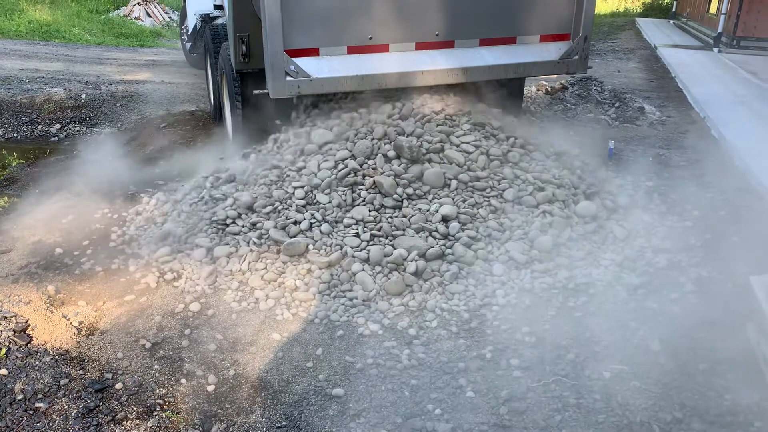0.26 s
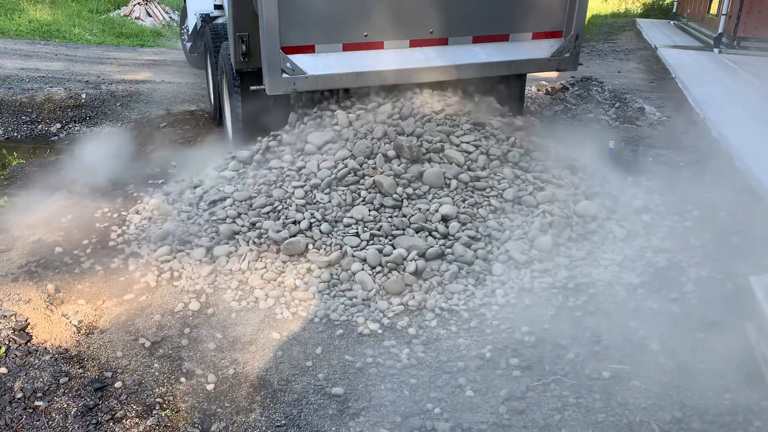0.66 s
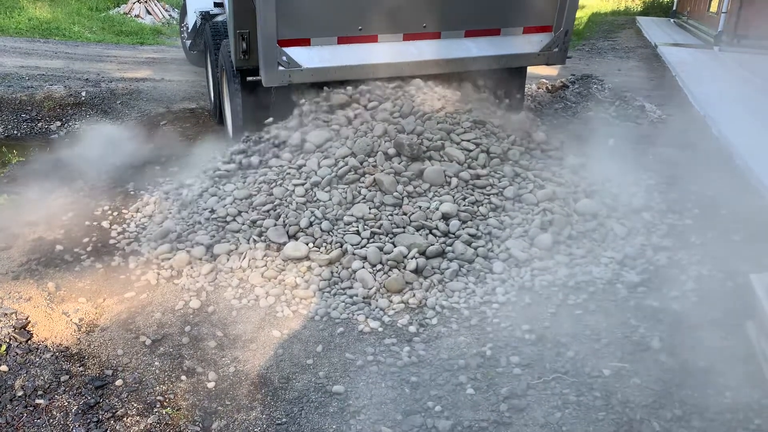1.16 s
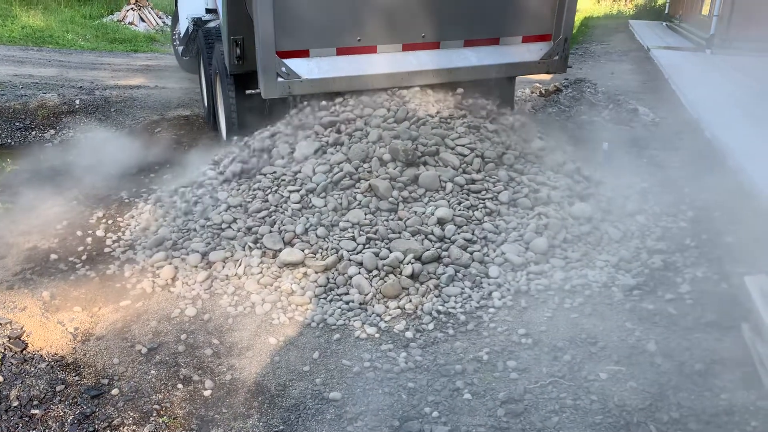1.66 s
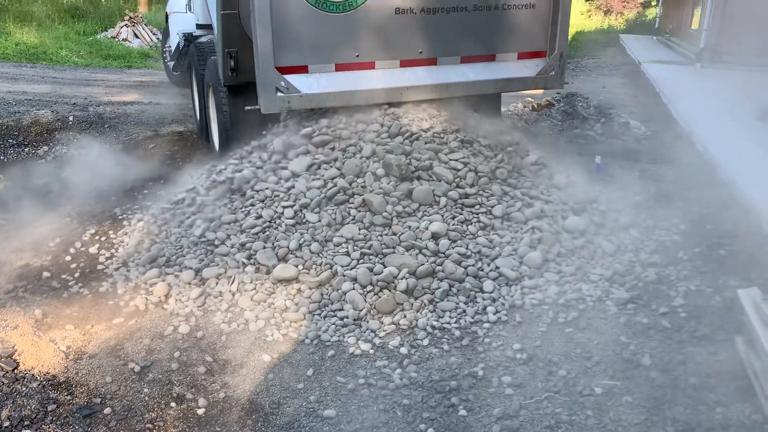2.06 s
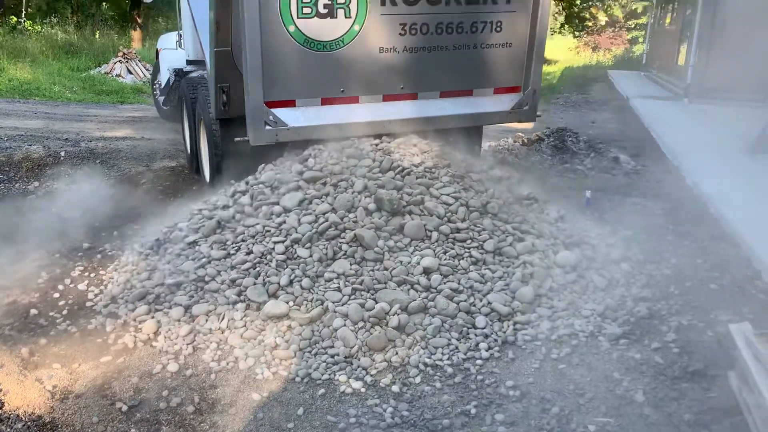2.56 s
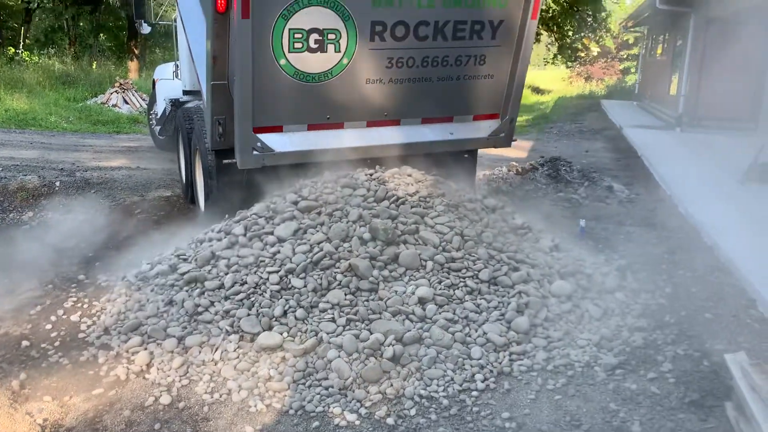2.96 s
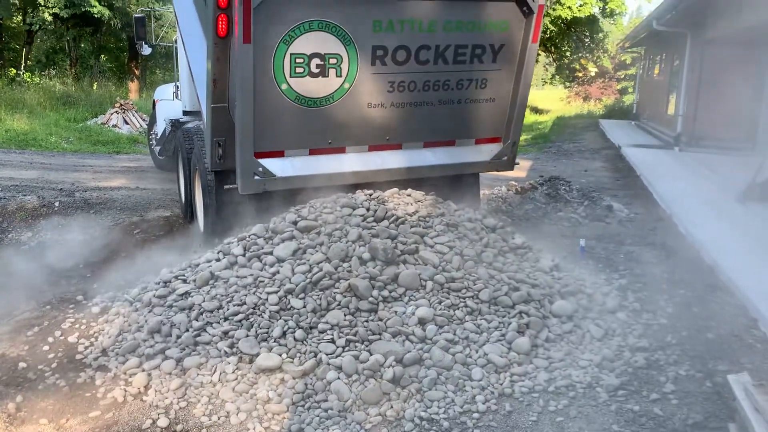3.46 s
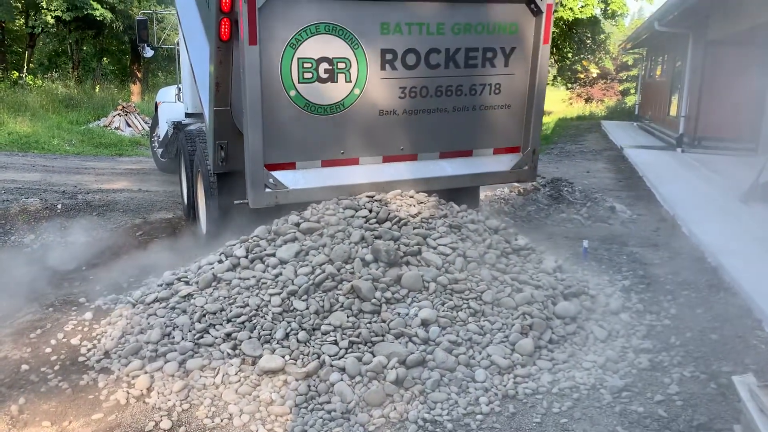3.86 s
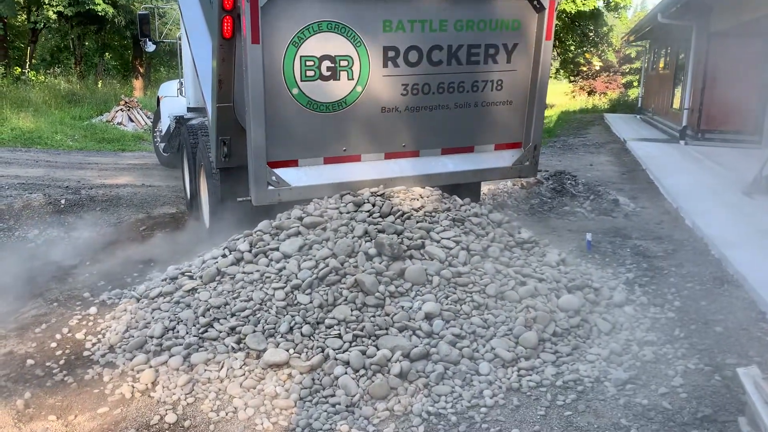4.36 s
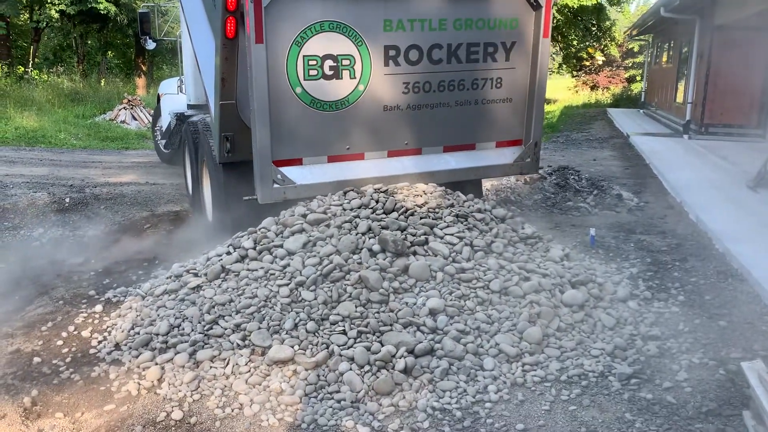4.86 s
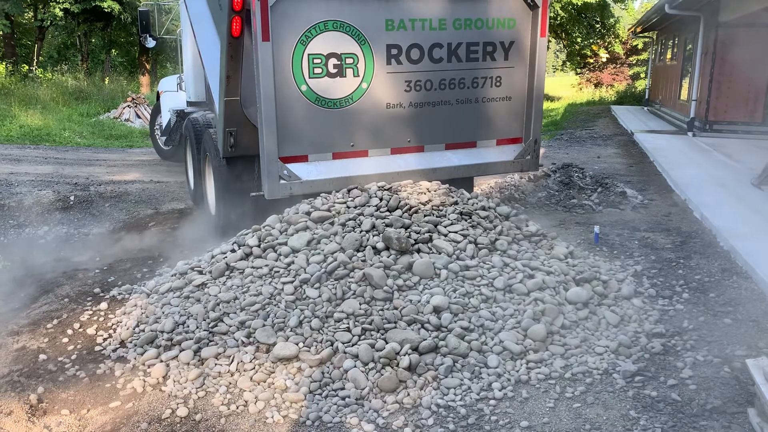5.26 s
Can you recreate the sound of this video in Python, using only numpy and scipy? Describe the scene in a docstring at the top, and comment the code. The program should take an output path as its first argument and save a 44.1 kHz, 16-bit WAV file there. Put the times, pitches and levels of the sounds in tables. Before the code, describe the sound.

Heard in stereo from a few metres behind a tipper truck on a gravel drive, river rock is already pouring at the start, a dense, bright clatter with larger cobbles knocking and a hollow drumming from the steel bed. From about 0.9 to 1.5 seconds the tailgate bangs in an irregular burst of heavy metallic blows, leaving long ringing tones; another knock comes near 1.9. Stones skitter over bare steel as the stream thins. Between 2.4 and 3.2 seconds air brakes release in sharp, overlapping hisses, the last loudest, echoing off the house. Around 3.75 light metal taps ring the emptied bed while stones crunch down the pile. Then it is quiet: sparse clicks and a faint low hoist hum over the diesel. Near 4.8 the hum stops with soft low thuds, leaving the idle, a faint slide at 5.1 and a clearer stony crunch at 5.4.

```python
"""A gravel drive beside a house, in stereo from a few metres behind a tipper truck as river rock pours off it.
Dense random collisions make the rush of stones; shaped noise drums on the steel bed and rings in its panels.
Blows of the tailgate excite decaying modes; air brakes hiss as noise jets with an echo off the house.
The hoist pump hums and stops, and the flow thins to single stones ticking down the pile over the idling diesel."""
import sys
import numpy as np
from scipy import signal
from scipy.fft import rfft, irfft, next_fast_len
from scipy.io import wavfile

SR = 44100
rng = np.random.default_rng(int(sys.argv[2]) if len(sys.argv) > 2 else 0)


def wrap_up_sound(samples):
    """Save the sound to the file named by the first command line argument, as 16-bit audio."""
    columns = np.atleast_2d(samples).T
    # keep every value between -1 and 1, then stretch to whole-number steps
    tamed = np.clip(columns, -1, 1)
    steps = np.round(tamed * 32767).astype(np.int16)
    wavfile.write(sys.argv[1], SR, steps)


N = 243873
T = np.arange(N) / SR
SIZE = next_fast_len(N)
BIN_HZ = np.maximum(np.arange(SIZE // 2 + 1) * SR / SIZE, 1)

# All colours below are relative: each coloured texture is brought to unit power before its level is set.
# share of direct sound at the microphone: (frequency [Hz], share of power [0..1])
DIRECT_SHARE = [(200, 0.24), (1000, 0.15), (2700, 0.4), (5000, 0.068), (8000, 1), (11000, 1), (15000, 0.53)]
# likeness of the scattered sound at the two microphone ports: (frequency [Hz], correlation [-1..1])
PORT_LIKENESS = [(100, 0.97), (280, 0.96), (550, 0.47), (1200, 0.56), (2200, 0.97), (4000, 0.1),
                 (6000, -0.52), (9000, -0.47), (15000, -0.85)]
# balance of the ports: (frequency [Hz], left minus right [dB])
LEFT_MINUS_RIGHT = [(1000, 0), (2000, 0.7), (4000, -4), (8000, -0.5)]
PORT_LAG_MS = 0.1768
CUTOFF_HZ = 15900

# colour of the diesel's rumble: (frequency [Hz], density [dB per Hz])
RUMBLE_COLOUR = [(25, -40.5), (45, -30), (70, 8.5), (110, 8.5), (160, 0), (230, 2), (350, 5), (480, -17),
                 (1200, -15), (2500, -19.5), (8000, -33)]
# level of the diesel's rumble: (time [s], level [dB])
RUMBLE_LEVEL = [(0, -45), (.8, -52.5), (2, -50.5), (3.1, -55), (3.65, -61), (3.9, -51), (4.3, -56.5),
                (5.53, -54)]
# first three firing orders of the diesel: (level driving the hoist [dB], level at idle [dB])
FIRING_ORDERS = [(-78, -76), (-70, -61.5), (-61.5, -64)]
FIRING_HZ = 37.55
# tones of the hoist pump: (frequency [Hz], relative level [dB], easing as the bed empties [dB per s])
PUMP_TONES = [(161.5, 0, 1), (368, 1, 7)]
PUMP_START_S, PUMP_RISE_S, PUMP_DB = 2.6, 0.22, -55
HOIST_STOP_S, HOIST_FADE_S = 4.8, 0.079

# low thuds as the body settles: (time [s], level [dB], rise [s], hold [s], t60 [s])
THUDS = [(4.81, -42, .012, 0.03, 0.22), (4.884, -50, .008, 0.011, 0.25), (4.938, -52, 0.008, 0.02, 0.25),
         (5.015, -53.5, .006, .012, 0.35)]
# colour of the thuds: (frequency [Hz], density [dB per Hz])
THUD_COLOUR = [(30, -22), (60, -7), (87, 5.5), (125, -13), (195, 5), (270, -9.5), (420, -10), (700, -23),
               (2000, -39), (8000, -80)]

# air let out of the brakes: (time [s], level [dB], hold [s], ring of the valve relative to the jet [dB])
AIR_PUFFS = [(2.411, -31, 0.05, -23.5), (2.557, -36.5, 0.03, -34), (2.594, -32.5, 0.14, -35),
             (2.693, -28, 0.035, -38), (2.778, -23.5, 0.0055, -27), (2.826, -27.5, 0.025, -27),
             (2.855, -27.5, 0.046, -11.5), (2.965, -29.5, 0.019, -21.5), (3.157, -20.5, 0.0082, -13)]
AIR_RISE_S, AIR_T60_S = 0.0027, 0.39
# resonances of the exhaust valve: (frequency [Hz], width [Hz], level [dB])
VALVE_TONES = [(1110, 160, 2.5), (1590, 92, 5), (1683, 30, 3)]
# colour of the jet: (frequency [Hz], density [dB per Hz])
JET_COLOUR = [(300, -34), (850, -23), (1150, -4.5), (2000, -1.5), (2400, -1.5), (3500, 2), (5500, 1),
              (8000, 7.5), (10500, 7), (13000, 0), (15800, 2)]
# colour of the sound lingering in the yard: (frequency [Hz], density [dB per Hz])
YARD_COLOUR = [(300, -9.5), (900, -3), (1200, 3.5), (1650, 7), (2600, -5.5), (5000, -11.5), (10000, -8),
               (15000, -36)]
# the valve's tone standing out in the yard: (frequency [Hz], width [Hz], height [dB])
YARD_PEAKS = [(1680, 88, 2.5)]
# the house wall throws each puff back
WALL_DELAY_S, WALL_DB, WALL_CUT_HZ = 0.134, -11.5, 2700

# modes of the air tank, rung by the last sharp release: (frequency [Hz], level [dB], t60 [s])
TANK_MODES = [(478, -8, 2.1), (1238, -4, 2.1), (1540, -2, 1.4), (1653, 0, 1.0), (1787, -10, 1.4),
              (2095, -5, .7)]
TANK_S, TANK_DB = 3.157, -46.5
# modes of the emptied bed, rung as the gate swings back on it: (frequency [Hz], level [dB], t60 [s])
EMPTY_BED_MODES = [(317.6, -7, 2.1), (350, -8, 2.1), (570.6, -14, 2.0), (1023, -12, 1.7), (1276, -10, 2.2),
                   (1319, 0, 1.2), (4720, -8, .55)]
EMPTY_BED_S, EMPTY_BED_DB = 3.738, -40
# all ringing modes waver in level
MODE_WAVER_DB, MODE_WAVER_PER_S = 2.5, 4

# blows on the steel body: (time [s], level [dB], low edge [Hz], contact cut-off [Hz],
# ring of the tailgate [dB], ring of the side walls [dB])
BLOWS = [(0.87, -24.5, 180, 1750, -45.5, -49), (0.888, -28, 800, 1800, -33.5, -48),
         (0.932, -25.5, 170, 4100, -42.5, -52), (0.961, -22.5, 150, 5840, -39, -47),
         (0.989, -23.5, 80, 10500, -26.5, -29.5), (1.023, -30, 200, 1700, -26.5, -43),
         (1.113, -35, 250, 900, -39, -49.5), (1.229, -24.5, 700, 2350, -48, -31),
         (1.241, -25.5, 1750, 2880, -52, -31.5), (1.279, -31, 220, 700, -40, -45),
         (1.307, -32, 1400, 2300, -58, -43), (1.341, -25, 800, 1600, -57, -34.5),
         (1.528, -33, 800, 3960, -58, -54), (1.887, -33, 900, 5000, -44, -43),
         (3.057, -38.5, 1500, 3300, -68, -70), (3.739, -40.5, 1050, 4370, -66, -65),
         (3.766, -36, 600, 4700, -61, -69), (3.789, -39.5, 200, 2000, -62, -69),
         (3.815, -35.5, 88, 2000, -50.5, -61.5), (3.862, -42.5, 80, 8000, -61, -66)]
CONTACT_SLOPE = 6.9   # how steeply a contact's power falls above its cut-off
LOW_SLOPE = 7   # how steeply a light blow's power falls below its low edge
# colour of the dense ring of the steel body: (frequency [Hz], density [dB per Hz])
STEEL_COLOUR = [(40, -44), (80, -3.5), (160, -8.5), (310, -12), (520, -3), (800, -5), (1200, -1.5),
                (1700, -1.5), (2600, -4), (5000, -9), (10000, -5), (15000, -3)]
# decay of the dense ring: (frequency [Hz], t60 [s])
STEEL_T60 = [(80, 1.8), (300, 1.2), (1200, 1.07), (2500, 0.44), (5000, 0.49), (12000, 0.51)]
# clusters of modes in the steel body: (frequency [Hz], width [Hz], height [dB])
STEEL_PEAKS = [(351, 54, 14.5), (1060, 73, 6), (1227, 40, 3.5), (1730, 35, 7.5), (2070, 50, 3)]
# strongest modes of the tailgate: (frequency [Hz], level [dB], t60 [s])
GATE_MODES = [(181.8, -10.5, 1.58), (306, -7.5, 2.6), (336, -6, 2.54), (362.5, 3.5, 1.22),
              (481.3, -3.5, 1.2), (644.3, -9, 2.9), (750, -10, 0.85), (973, -4, 0.9), (1080, -7.5, 0.7),
              (1222, -9, 1.2), (1415, -12.5, 1.9), (1478, -3.5, 0.9), (1620, -3, 0.76), (1768, -16, 1.2),
              (2457, -25, 0.6)]
# strongest modes of the side walls: (frequency [Hz], level [dB], t60 [s])
WALL_MODES = [(512, -11.5, 3.1), (658.4, -6, 4.03), (735.5, -12, 5.1), (855, -14.5, 1.8),
              (1057, -17.5, 6.6), (1090, -3, 0.55), (1174, -20, 11), (1222, 3, 0.68), (1310, -10, 1.8),
              (1465, -14.5, 2.5), (1529, -11.5, 1.5), (1700, -10.5, 2.5), (1773, -5.5, 2.2)]

# the last of the load skitters over bare steel: (time [s], level [dB], rise [s], hold [s], t60 [s])
SKITTER = (1.75, -42, 0.5, 0.32, 1.1)
# resonances of the bare floor: (frequency [Hz], width [Hz], level [dB])
BARE_FLOOR_TONES = [(1044, 81, -1.5), (1140, 55, -5.5), (1350, 210, -1), (1640, 150, 1.5)]
# colour of the drumming bed: (frequency [Hz], density [dB per Hz])
BED_COLOUR = [(40, -20), (90, -16.5), (200, -3), (280, 0.5), (420, -3.5), (640, -6), (1000, -11.5),
              (2000, -17), (5000, -49)]
# panel tones of the bed under sliding stones: (frequency [Hz], width [Hz], level [dB])
BED_TONES = [(274, 6, 0), (361, 10, -13), (395, 10, -11), (484, 8, -11), (509, 8, -9), (635, 12, -7),
             (730, 8, -11), (895, 10, -13)]
# the load shifts and drums along the bed: (time [s], level [dB], rise [s], hold [s], t60 [s])
SURGES = [(0, -34, 0.0019, 0.029, 1.3), (0.847, -34, 0.12, .1, 9.9), (3.724, -41.5, 0.15, 0.026, 0.87)]
DRUM_DB = -7.5   # bed level under the flow, relative to its clatter
PRESS_DB_PER_DB = 1.34   # a fuller flow presses harder on the panels and brings out their tones

# small slides of stones down the pile: (time [s], level [dB], rise [s], hold [s], t60 [s])
SLIDES = [(3.75, -39.5, 0.033, 0.11, 0.27), (5.102, -48.5, 0.036, 0.014, 0.25),
          (5.396, -45.5, 0.024, 0.015, 0.28)]
# colour of the slides: (frequency [Hz], density [dB per Hz])
CRUNCH_COLOUR = [(600, -2), (1200, 2.5), (1650, 8), (2200, 0), (2800, 4), (5000, -2.5), (8000, -8),
                 (11000, -13.5), (15000, -48)]
# loudest single stones dropping on the pile: (time [s], click level [dB], pitch [Hz], t60 [s])
STONES = [(.058, -27.5, 11300, 0.03), (.784, -24, 6500, 0.017), (3.53, -47, 6640, .006),
          (3.611, -35, 10340, 0.0018), (3.719, -41, 6000, 0.0028), (3.823, -27, 11000, .003),
          (4.133, -39, 6200, 0.0045), (4.153, -38.5, 3300, 0.007), (4.226, -46, 4600, .004),
          (4.239, -44, 6700, 0.0043), (4.368, -42.5, 3850, 0.0024), (4.465, -44.5, 1970, 0.026),
          (4.627, -48, 5458, 0.0013), (4.934, -49, 9000, .002), (5.128, -43, 1660, 0.028),
          (5.399, -30, 1850, 0.011), (5.417, -29.5, 1680, 0.032), (5.428, -31, 2700, .008),
          (5.457, -38, 3000, 0.0026)]
# colour of larger cobbles knocking on top of the stream: (frequency [Hz], density [dB per Hz])
COBBLE_COLOUR = [(600, -12.5), (1200, -2), (2000, -2), (3500, 1), (6000, -1), (12000, -13.5)]
COBBLE_DB = -8   # relative to the flow
# rock off the bed, running out to a trickle: (time [s], level [dB])
FLOW = [(0, -33.5), (1.5, -32), (2.1, -37), (2.7, -39), (3.5, -55), (4.4, -69.5), (5.53, -76)]
FULL_FLOW_DB = -33.5
SPILL_DB = -14.5   # clatter that a surge adds to the flow, relative to its level on the bed
# colour of the clatter: (frequency [Hz], density [dB per Hz])
CLATTER_COLOUR = [(600, -1.5), (1100, -5.5), (1700, -1), (2400, -4), (3400, 0.5), (4500, -3), (6200, -4),
                  (8000, -1.5), (11000, -6.5), (15500, -14.5)]


def from_db(db):
    """Decibels to gain."""
    return 10 ** (np.asarray(db) / 20)


def add_db(*levels):
    """Level of unrelated sounds heard together."""
    return 10 * np.log10(sum(from_db(db) ** 2 for db in levels))


def rms_one(x):
    """Scale to unit power."""
    return x / np.sqrt(np.mean(x ** 2) + 1e-20)


def in_time(rows):
    """A (time, level) curve at every sample."""
    times, levels = np.transpose(rows)
    return np.interp(T, times, levels)


def at_hz(points, hz):
    """Read a table on a log-frequency axis."""
    table_hz, values = np.transpose(points)
    return np.interp(np.log(hz), np.log(table_hz), values)


def drift(rate):
    """Slow chance with a spread of one, drawn every 40 samples and joined by lines."""
    r = np.exp(-80 * np.pi * rate / SR)
    noise = rng.standard_normal(N // 40 + 2002)
    slow = signal.lfilter([1], [1, -2 * r, r * r], noise)[2000:]   # skip the filter's start
    return np.interp(np.arange(N) / 40, np.arange(len(slow)), rms_one(slow))


def impulses(times, sizes):
    """Single clicks at the given times."""
    out = np.zeros(N)
    samples = np.round(np.asarray(times) * SR).astype(int)
    out[np.clip(samples, 0, N - 1)] = sizes
    return out


def swell(s, db, rise, hold, t60):
    """An envelope that rises, holds and dies away."""
    rising = np.clip((T - s) / max(rise, 1e-3), 0, 1)
    fall_db = 60 * np.clip((T - s - rise - hold) / t60, 0, 2)
    return rising * from_db(db - fall_db)


def die_away(power, t60):
    """Every bit of power put in lingers and dies exponentially."""
    return signal.lfilter([1], [1, -from_db(-120 / (t60 * SR))], power + 1e-18)


def resonate(x, hz, width_hz):
    """A resonance with a gain of one at its top."""
    r = np.exp(-np.pi * width_hz / SR)
    feed = np.array([1, 0, -1]) * (1 - r * r) / 2
    return signal.lfilter(feed, [1, -2 * r * np.cos(2 * np.pi * hz / SR), r * r], x + 1e-18)


def noise_tones(rows):
    """Steady noise keeps each (frequency, width, level) resonance sounding."""
    return sum(from_db(db) * rms_one(resonate(rng.standard_normal(N), hz, width)) for hz, width, db in rows)


def ring(clicks, hz, t60):
    """A unit click sets a decaying sine ringing."""
    r, w = from_db(-60 / (t60 * SR)), 2 * np.pi * hz / SR
    return signal.lfilter([0, np.sin(w)], [1, -2 * r * np.cos(w), r * r], clicks + 1e-18)


def hum(hz, wander, waver_db, per_s=5.5):
    """A slightly unsteady tone of unit power."""
    phase = np.cumsum(hz * (1 + wander * drift(3.0))) / SR + rng.random()
    return rms_one(np.sin(2 * np.pi * phase) * from_db(waver_db * drift(per_s)))


def ringing_plate(modes, times, ring_db):
    """Every blow tops up the energy of a plate's modes; each wavers and dies away at its own rate."""
    energy = impulses(times, from_db(ring_db) ** 2)
    out = 0
    for hz, db, t60 in modes:
        tone = hum(hz, wander=0.002, waver_db=MODE_WAVER_DB, per_s=MODE_WAVER_PER_S)
        out = out + from_db(db) * np.sqrt(die_away(energy, t60) / 2) * tone
    return out


def port_lag():
    """Sound from the truck reaches the left port a little late."""
    return np.exp(-2j * np.pi * BIN_HZ * PORT_LAG_MS / 1000 * np.array([[1], [0]]))


def from_truck(x):
    """One direct sound at both microphone ports."""
    return irfft(rfft(x, SIZE) * port_lag(), SIZE)[:, :N]


def field(spectrum, raw=None, ripple_db=0, ripple_hz=30, peaks=()):
    """A coloured stereo texture of unit power: a direct part plus parts scattered by ground and walls."""
    direct, mid, side = rfft(rng.standard_normal((3, N)) if raw is None else raw, SIZE)
    share = np.clip(at_hz(DIRECT_SHARE, BIN_HZ), 0, 1)
    alike = np.clip(at_hz(PORT_LIKENESS, BIN_HZ), -1, 1)
    scattered = np.sqrt((1 + alike) / 2) * mid + np.sqrt((1 - alike) / 2) * side * [[1], [-1]]
    both = np.sqrt(share) * direct * port_lag() + np.sqrt(1 - share) * scattered
    # crowded modes and reflections leave narrow peaks and dips, weaker below 1 kHz
    ripple = np.interp(BIN_HZ / ripple_hz, np.arange(4000), rng.standard_normal(4000))
    ripple = ripple * np.minimum(BIN_HZ / 1000, 1)
    humps = sum(db / (1 + (2 * (BIN_HZ - hz) / width) ** 2) for hz, width, db in peaks)
    balance = at_hz(LEFT_MINUS_RIGHT, BIN_HZ) * np.array([[0.5], [-0.5]])
    colour_db = at_hz(spectrum, BIN_HZ) + ripple_db * ripple + humps + balance
    return rms_one(irfft(both * from_db(colour_db), SIZE)[:, :N])


def collisions(per_s, spread_db, sharpness, count=26):
    """Stones knock together at random; each size of stone rings a few cycles at its own pitch."""
    at = np.flatnonzero(rng.random(N) < per_s / SR)
    strength_db = spread_db * np.minimum(rng.exponential(1, N), 5)
    sizes = from_db(strength_db)[at] * rng.choice([-1, 1], N)[at]
    dealt = rng.integers(0, count, N)[at]   # which size of stone each knock belongs to
    knocks = 0
    for k, hz in enumerate(np.geomspace(650, 15000, count)):
        knocks = knocks + resonate(impulses(T[at], sizes * (dealt == k)), hz, hz / sharpness)
    return knocks / np.sqrt(per_s)


def engine(throb=0.24):
    """The diesel's rumble throbs at the firing rate; as the hoist stops, pump hum ends and orders rebalance."""
    throbbing = 1 + throb * np.sin(2 * np.pi * FIRING_HZ * T)
    rumble = from_db(in_time(RUMBLE_LEVEL)) * field(RUMBLE_COLOUR) * throbbing
    load = np.clip(1 - (T - HOIST_STOP_S) / HOIST_FADE_S, 0, 1)
    orders = 0
    for order, (loaded_db, idle_db) in enumerate(FIRING_ORDERS, 1):
        tone = hum(order * FIRING_HZ, wander=0.0064, waver_db=4.0)
        orders = orders + from_db(idle_db + load * (loaded_db - idle_db)) * tone
    since_start = T - PUMP_START_S
    pumping = load * np.clip(since_start / PUMP_RISE_S, 0, 1) * from_db(PUMP_DB)
    pump = sum(from_db(db - ease * since_start) * hum(hz, wander=0.002, waver_db=0.7)
               for hz, db, ease in PUMP_TONES)
    return rumble + orders + pumping * pump


def hoist_stop():
    """The heavy body shudders on its frame in low thuds of noise."""
    return field(THUD_COLOUR) * sum(swell(*row) for row in THUDS)


def air_brakes(echo_db=-11, echo_t60=0.92, flutter_db=1.0):
    """A valve rings as its jet holds and fades with falling pressure; wall and yard give duller echoes."""
    puffs = [swell(s, db, AIR_RISE_S, hold, AIR_T60_S) for s, db, hold, ring_db in AIR_PUFFS]
    ringing = sum(puff * from_db(row[-1]) for puff, row in zip(puffs, AIR_PUFFS))
    valve = from_truck(ringing * rms_one(noise_tones(VALVE_TONES)))
    hiss = field(JET_COLOUR, ripple_db=2.8, ripple_hz=36)
    jet = sum(puffs) * hiss * from_db(flutter_db * drift(50)) + valve
    late = np.array([np.interp(T - WALL_DELAY_S, T, port, left=0) for port in jet])
    wall = signal.sosfilt(signal.butter(2, WALL_CUT_HZ, fs=SR, output="sos"), late + 1e-18)
    # scaled so that a steady puff would settle at its own power
    lingering = die_away(sum(puff ** 2 for puff in puffs), echo_t60) * np.log(1e6) / (echo_t60 * SR)
    yard = np.sqrt(lingering) * field(YARD_COLOUR, ripple_db=6.0, ripple_hz=20, peaks=YARD_PEAKS)
    return jet + from_db(WALL_DB) * wall + from_db(echo_db) * yard


def lingering_steel():
    """The air tank and the emptied bed each ring on with a few clear decaying modes."""
    tank = ringing_plate(TANK_MODES, [TANK_S], TANK_DB)
    empty_bed = ringing_plate(EMPTY_BED_MODES, [EMPTY_BED_S], EMPTY_BED_DB)
    return from_truck(tank + empty_bed)


def tailgate(crash_t60=0.37, crash_db=8.5, tail_db=6.5, count=20):
    """Blows give a short crash, a dense steel tail longest in the bass, and clear modes of gate and walls."""
    s, level_db, low_hz, cut_hz, gate_db, walls_db = np.transpose(BLOWS)
    dense = rfft(field(STEEL_COLOUR, ripple_db=3.5, ripple_hz=14, peaks=STEEL_PEAKS), SIZE)
    centres = np.geomspace(60, 14000, count)
    out = 0
    for hz, pick in zip(centres, np.eye(count)):
        # overlapping triangular bands on a log-frequency axis
        band = irfft(dense * np.interp(np.log(BIN_HZ), np.log(centres), pick), SIZE)[:, :N]
        # a soft contact puts little into the high modes, a light one little into the low ones
        softness = 1 + (hz / cut_hz) ** CONTACT_SLOPE
        lightness = 1 + (low_hz / hz) ** LOW_SLOPE
        power = impulses(s, from_db(level_db) ** 2 / softness / lightness)
        crash = from_db(crash_db) ** 2 * die_away(power, crash_t60)
        tail = from_db(tail_db) ** 2 * die_away(power, at_hz(STEEL_T60, hz))
        out = out + band * np.sqrt(crash + tail)
    return out + from_truck(ringing_plate(GATE_MODES, s, gate_db) + ringing_plate(WALL_MODES, s, walls_db))


def skitter():
    """As the bed empties, sliding stones excite the higher tones of its bare floor."""
    return from_truck(swell(*SKITTER) * rms_one(noise_tones(BARE_FLOOR_TONES)))


def steel_bed(level_db, flow_db, tones_db=-5.0, drum_db=-3.5):
    """Sliding stones drum on the bed and keep its panel tones alive."""
    press_db = PRESS_DB_PER_DB * (flow_db - FULL_FLOW_DB)
    panels = rms_one(from_truck(noise_tones(BED_TONES)))
    drumming = from_db(drum_db) * field(BED_COLOUR)
    return from_db(level_db) * (drumming + from_db(tones_db + press_db) * panels)


def slides():
    """A patch of the pile gives way with a short crunch of many collisions."""
    raw = np.array([collisions(per_s=4600, spread_db=1.5, sharpness=9.7, count=18)
                    for path in ("direct", "mid", "side")])
    return field(CRUNCH_COLOUR, raw) * sum(swell(*row) for row in SLIDES)


def single_stones(scatter_db=-20, scatter_t60=0.13, sharpness=3.9):
    """A lone stone clicks at its own pitch and stirs the grit around it."""
    clicks, grit, hiss = 0, 0, rng.standard_normal((2, N))
    for s, db, hz, t60 in STONES:
        touch = impulses([s], from_db(db))
        clicks = clicks + ring(touch, hz, t60)
        stirred = rms_one(resonate(hiss, hz, hz / sharpness))
        grit = grit + np.sqrt(die_away(touch ** 2, scatter_t60)) * stirred
    return from_truck(clicks) + from_db(scatter_db) * grit


def cobbles(flow_db):
    """Fist-sized stones of much the same weight rattle evenly over the finer rush."""
    knocks = collisions(per_s=520, spread_db=0.8, sharpness=9.0, count=23)
    # each knock arrives directly and again off the ground and the tailgate
    raw = np.array([np.interp(T - delay_s, T, knocks, left=0) for delay_s in (0, 0.004, 0.009)])
    return from_db(flow_db + COBBLE_DB) * field(COBBLE_COLOUR, raw)


def pouring_rock(level_db, full_per_s=14000, full_db=-35):
    """The thinner the stream of rock, the fewer and more distinct its collisions."""
    per_s = full_per_s * from_db((level_db - full_db) / 2)
    raw = np.array([collisions(per_s, spread_db=-0.5, sharpness=6.0) for path in ("direct", "mid", "side")])
    clatter = field(CLATTER_COLOUR, raw, ripple_db=3.5, ripple_hz=35.03)
    return from_db(level_db + 0.29 * drift(24)) * clatter


def scene():
    """Engine, air, steel and rock, all heard from a few metres behind the truck."""
    flow_db = in_time(FLOW)
    surge_db = 20 * np.log10(sum(swell(*row) for row in SURGES) + 1e-9)
    background = engine() + hoist_stop() + air_brakes()
    bed = steel_bed(add_db(flow_db + DRUM_DB, surge_db), flow_db)
    steel = lingering_steel() + tailgate() + skitter() + bed
    stream = cobbles(flow_db) + pouring_rock(add_db(flow_db, surge_db + SPILL_DB))
    rock = slides() + single_stones() + stream
    return background + steel + rock


def record(dry):
    """The microphone drops the deep bass and the top is cut."""
    thin = signal.sosfilt(signal.butter(2, 30, "high", fs=SR, output="sos"), dry)
    return signal.sosfilt(signal.ellip(12, 0.1, 80, CUTOFF_HZ, fs=SR, output="sos"), thin)


dry = scene()
out = record(dry)
wrap_up_sound(out)
```